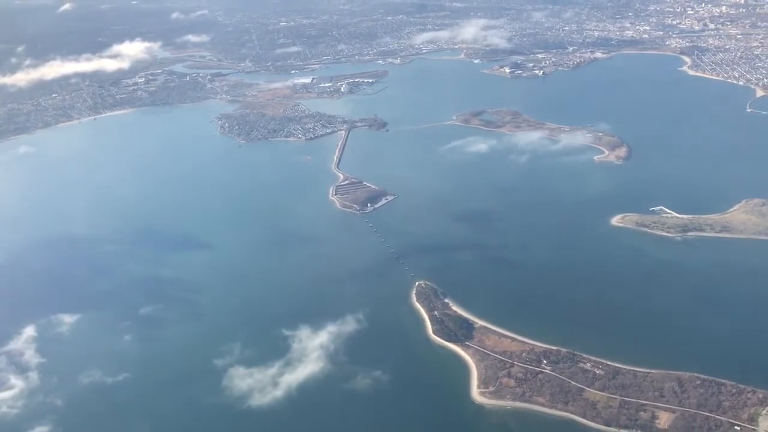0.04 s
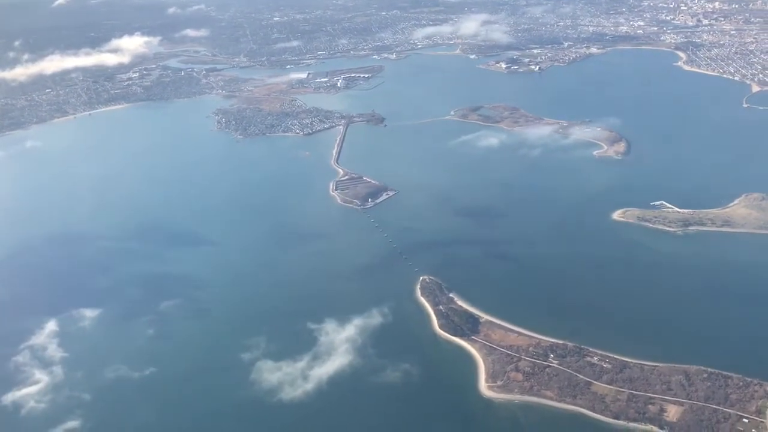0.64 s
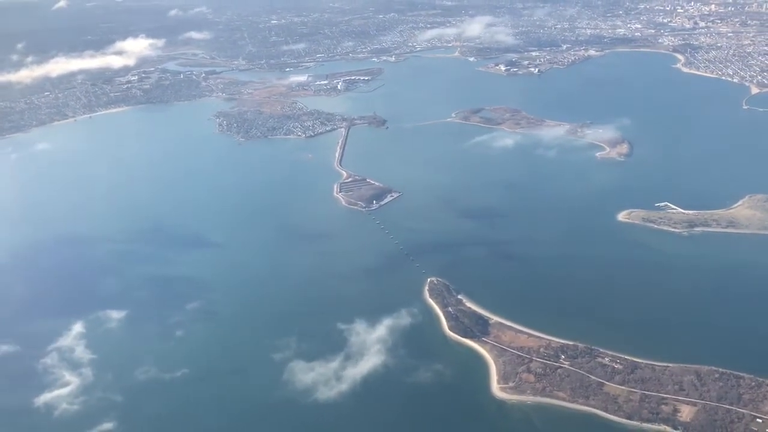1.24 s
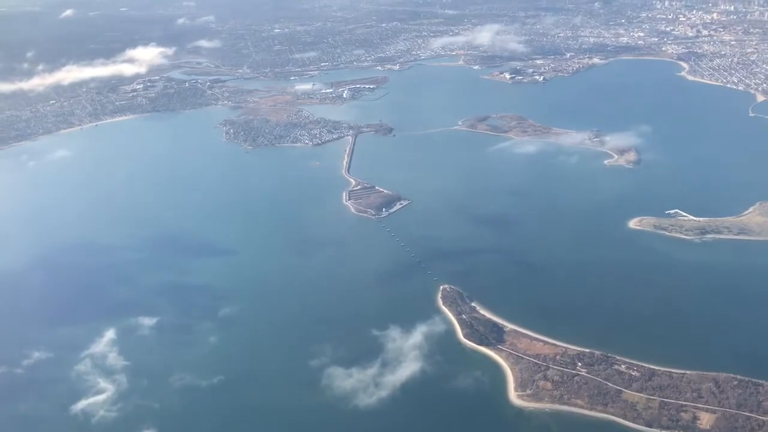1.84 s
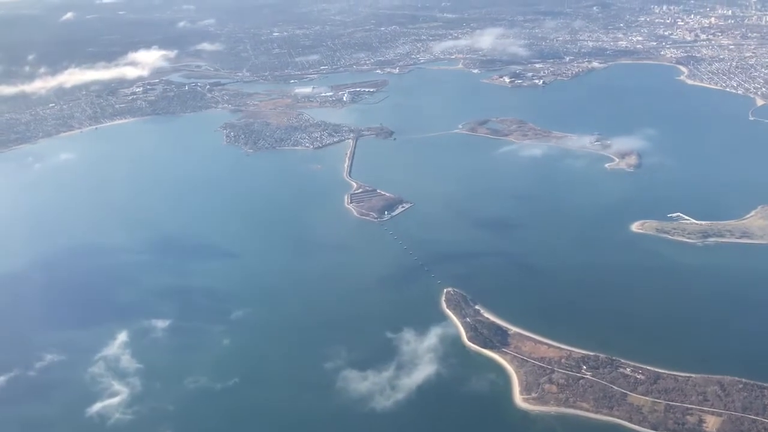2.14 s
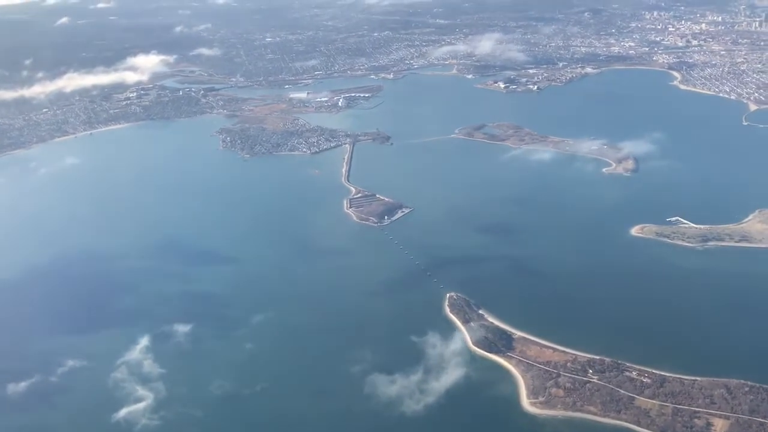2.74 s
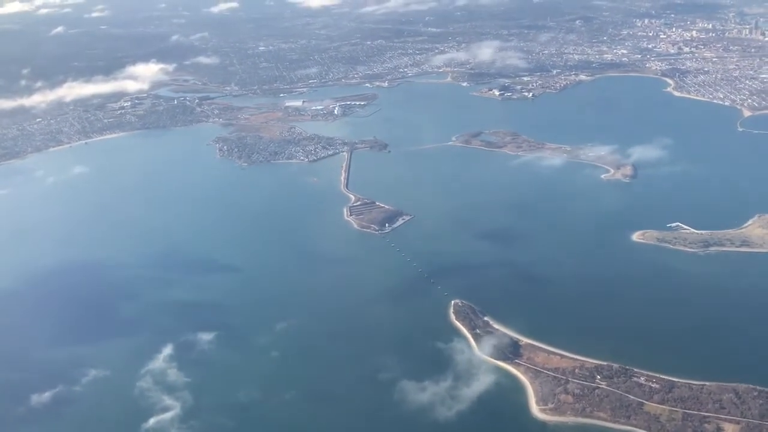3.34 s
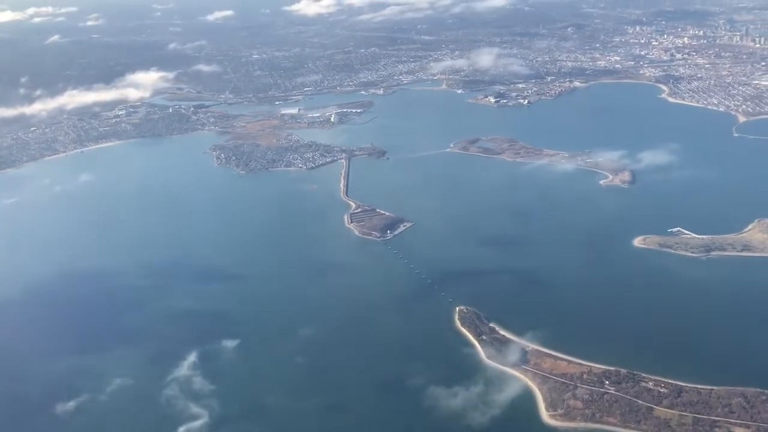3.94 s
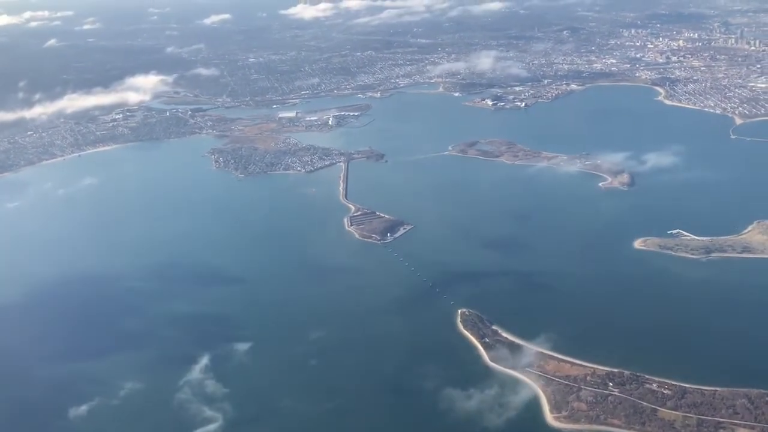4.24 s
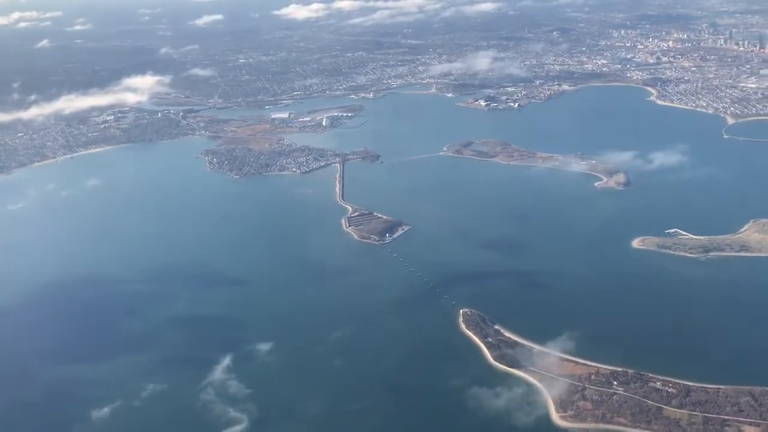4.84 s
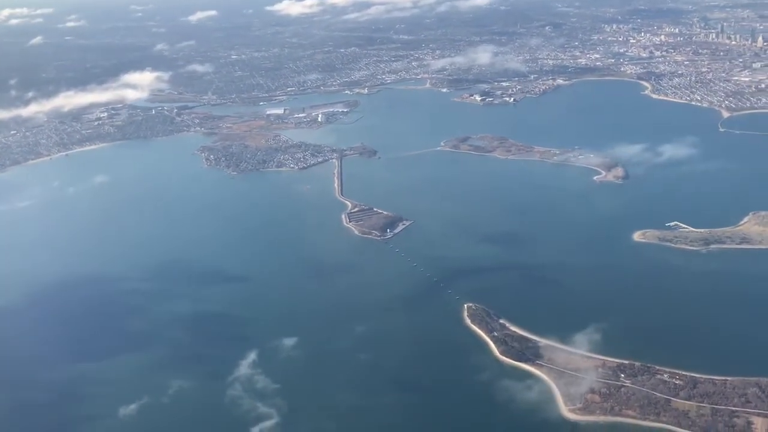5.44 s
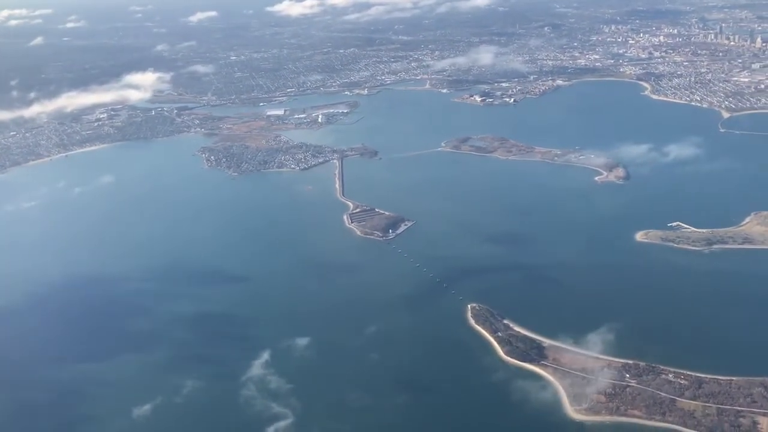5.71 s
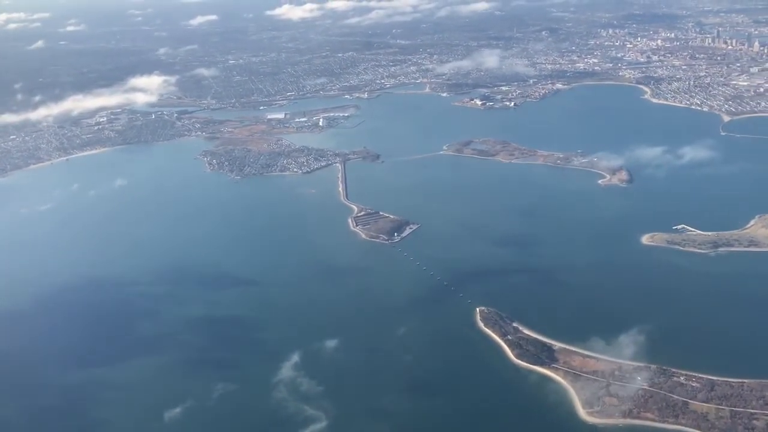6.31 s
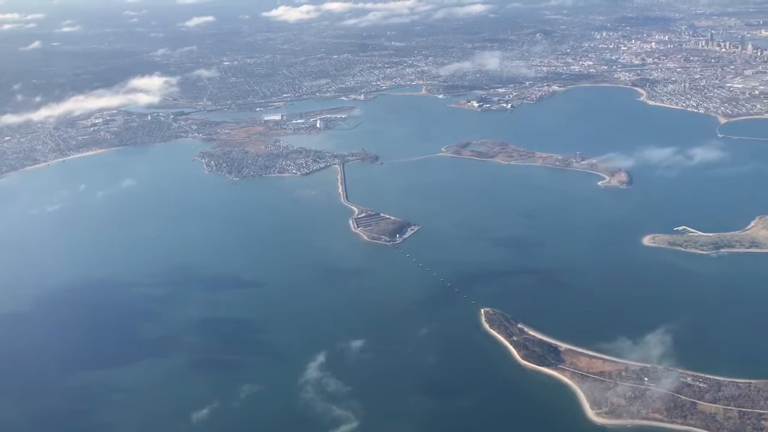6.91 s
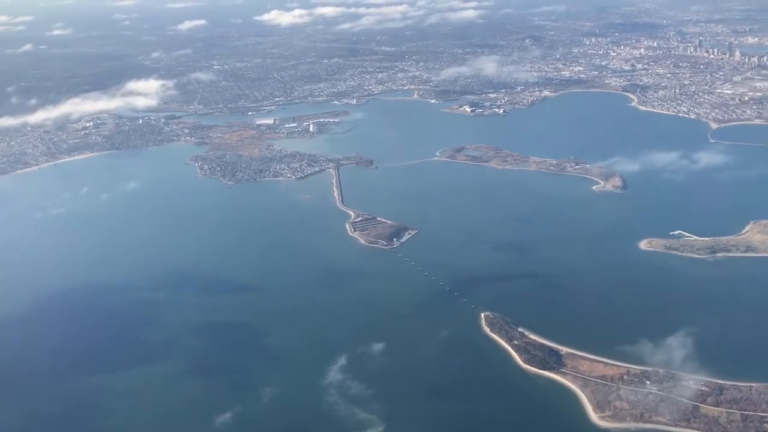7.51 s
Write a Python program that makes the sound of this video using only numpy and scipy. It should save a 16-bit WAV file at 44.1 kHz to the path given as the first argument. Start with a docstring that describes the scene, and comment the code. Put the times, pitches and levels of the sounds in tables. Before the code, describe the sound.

Inside an airliner cabin during descent, heard from a window seat, a deep engine drone and the low boom of air rushing over the fuselage run steadily throughout. Above them sit a soft vent hiss and a thin, steady high whine. A fainter, higher whistle eases back about three seconds in, and a few tiny plastic ticks are barely audible around then. The overall level stays even.

```python
"""A steady boom of air over a deep engine drone: an airliner cabin on descent, by a window.
Turbulence on the fuselage drives panel and cabin resonances; unbalanced fans hum, slowly winding down.
Engine cores, pumps and blowers hold their tones; the vents hiss.
A small turbine whistles thinly, climbs, then is eased back. Plastic trim slips with faint ticks."""
import sys
import numpy as np
from scipy import signal
from scipy.fft import rfft, irfft
from scipy.io import wavfile

SR = 44100
rng = np.random.default_rng(int(sys.argv[2]) if len(sys.argv) > 2 else 0)


def waveform_to_disk(signal):
    """Save audio, clipped to [-1, 1], as 16-bit WAV at the path in sys.argv[1]."""
    frames = np.transpose(np.atleast_2d(signal))
    scaled = np.clip(frames, -1, 1) * 32767
    samples = np.round(scaled).astype(np.int16)
    wavfile.write(sys.argv[1], SR, samples)


N = 333816
TIME_S = np.arange(N) / SR
BIN_HZ = np.fft.rfftfreq(N, 1 / SR)

# fuselage air noise through the wall: f/Hz, density/(dB per Hz)
FUSELAGE_SPECTRUM = [(15, -71), (38, -63), (50, -44), (60, -51), (73, -61), (145, -62.5), (240, -60),
                     (340, -59.5), (420, -68), (620, -71.5), (1000, -79.5), (1600, -87), (3000, -101.5),
                     (6000, -130)]
# panel and cabin resonances: f/Hz, width/Hz, lift/dB
CABIN_MODES = [(109, 64.6, 17.5), (175.5, 51, 7), (216, 6.5, 7), (312.6, 84.6, 9.5), (570, 124, 4),
               (801, 24, 6), (932, 158, 6.5), (1243, 154, 5), (1417, 70, 8.5)]
# engine core, blower and pump tones: f/Hz, level/dB, wander/Hz, fuzz share/1, fuzz width/Hz
ROTOR_TONES = [ (190.9, -37.5, 0.27, 0.34, 2.5), (388.7, -48, 0.31, 0.21, 2.4),
               (1165, -62.5, 1.49, 0.26, 10), (2165, -67.5, 3.96, 0.74, 20), (2295.5, -53.7, .45, .03, 4),
               (2875, -72, 1.5, .4, 12), (4095, -79.5, 3, .6, 18), (5152, -71.3, 5, .6, 22),
               (6116, -77.5, 2.5, .4, 14), (11800, -87, 20, 1, 130), ]
# vent hiss: f/Hz, density/(dB per Hz)
VENT_SPECTRUM = [(300, -125), (800, -101.6), (1800, -85), (3000, -86), (3300, -89), (4400, -91),
                 (4900, -94), (5400, -91.5), (7000, -96), (7700, -100.1), (8500, -96), (9500, -99.8),
                 (10400, -106.2), (11600, -101.9), (15500, -105.9)]
# air duct resonances: f/Hz, width/Hz, lift/dB
DUCT_MODES = [(2706, 280, 5.5), (2997, 45, 7.5)]
# plastic trim ticks: t/s, peak level/dB, f/Hz, width/Hz, rise/s
TRIM_TICKS = [ (2.917, -44.5, 13200, 4400, .0015), (3.834, -50, 9000, 9000, .001),
              (3.881, -38, 3450, 220, .0015), ]

FAN_START_HZ, FAN_SAG_HZ_PER_S = 46.15, .155
SHAFT_HZ = FAN_START_HZ - FAN_SAG_HZ_PER_S * TIME_S


def fuselage():
    """Air rushing over the skin booms through panels and cabin."""
    return airflow(FUSELAGE_SPECTRUM, CABIN_MODES, gust_db=.4, gust_hz=4.7)


def fan():
    """Unbalance shakes the airframe once a turn: a near-pure drone, fading as the shaft slows."""
    start_db, loss_db_per_hz = -25.7, 4.5
    level_db = start_db - loss_db_per_hz * (FAN_START_HZ - SHAFT_HZ)
    return gain_of(level_db) * tone(SHAFT_HZ, fuzz=.01, width_hz=2.5)


def rotors():
    """Cores, blowers and pumps hold speed, with slight wander."""
    return sum(gain_of(level_db) * tone(hz + wander_hz * drift(rate_hz=.806), fuzz, width_hz)
               for hz, level_db, wander_hz, fuzz, width_hz in ROTOR_TONES)


def vents():
    """Duct-coloured hiss; weak echoes off wall, seats and bins ripple its spectrum."""
    echo_db, spread_s, count = -18, .018, 24
    hiss = airflow(VENT_SPECTRUM, DUCT_MODES, gust_db=.1, gust_hz=4)
    delays = (rng.uniform(.1, 1, count) * spread_s * SR).astype(int)
    signs = rng.choice([-1, 1], count)
    echoes = sum(sign * np.roll(hiss, delay) for sign, delay in zip(signs, delays))
    return hiss + gain_of(echo_db) * echoes / np.sqrt(count)


def turbine_whistle():
    """Blade tone, scattered by turbulence; climbs until eased, then softens fast and coasts down."""
    start_hz, climb_hz_per_s, settled_hz = 8610, 26, 8560
    ease_at_s, coast_tau_s = 3.0, 1.2
    start_db, drop_db, fade_s = -64.5, 3.6, .25
    eased_s = np.maximum(TIME_S - ease_at_s, 0)
    level_db = start_db - drop_db * np.minimum(eased_s / fade_s, 1)
    driven_hz = start_hz + climb_hz_per_s * np.minimum(TIME_S, ease_at_s)
    blade_hz = settled_hz + (driven_hz - settled_hz) * np.exp(-eased_s / coast_tau_s)
    blade_hz += 7 * drift(rate_hz=5)
    core = tone(blade_hz, fuzz=.55, width_hz=24)
    # uneven blades: side tones at +/-2 shaft orders
    sides = sum(tone(blade_hz + order * SHAFT_HZ, fuzz=.85, width_hz=22) for order in (-2, 2))
    skirt = tone(blade_hz, fuzz=.8, width_hz=140)
    return gain_of(level_db) * (gain_of(-3.5) * core + gain_of(-7.5) * sides + gain_of(-4) * skirt)


def whine_harmonic():
    """Second harmonic of the 2295.5 Hz rotor whine: a thin tone that swells and ebbs."""
    whine_hz, mean_db, swell_db = 4591, -68.9, 1.3
    level_db = mean_db + swell_db * drift(rate_hz=.8)
    return gain_of(level_db) * tone(whine_hz + drift(rate_hz=.87), fuzz=.074, width_hz=9)


def trim_ticks():
    """Plastic panels slip in their seats: tiny bursts of band noise."""
    ticks = np.zeros(N)
    for start_s, peak_db, hz, width_hz, rise_s in TRIM_TICKS:
        ring = noise(1 / (1 + (2 * (BIN_HZ - hz) / width_hz) ** 4))
        age = np.maximum(TIME_S - start_s, 0) / rise_s
        burst = ring * age * np.exp(-age)
        ticks += gain_of(peak_db) * burst / abs(burst).max()
    return ticks


def airflow(spectrum, modes, gust_db, gust_hz):
    """Turbulence: broad slope, lifted at each resonance, swelling slightly."""
    knot_hz, knot_db = np.transpose(spectrum)
    slope_db = np.interp(np.log(BIN_HZ + 1), np.log(knot_hz + 1), knot_db)
    lift_db = sum(db / (1 + (2 * (BIN_HZ - hz) / width_hz) ** 2) for hz, width_hz, db in modes)
    return noise(gain_of(slope_db + lift_db)) * gain_of(gust_db * drift(gust_hz))


def tone(hz, fuzz, width_hz):
    """Unit-rms tone on a pitch curve; turbulence smears the power share `fuzz` into a narrow band."""
    phase = 2 * np.pi * (np.cumsum(hz) / SR + rng.random())
    smear = drift(width_hz) * np.cos(phase) + drift(width_hz) * np.sin(phase)
    return np.sqrt(2 * (1 - fuzz)) * np.cos(phase) + np.sqrt(fuzz) * smear


def drift(rate_hz):
    """Unit-rms random wander, rolled off above rate_hz."""
    wander = noise(1 / (1 + (BIN_HZ / rate_hz) ** 2))
    return wander / np.sqrt(np.mean(wander ** 2) + 1e-20)


def noise(gain_per_root_hz):
    """Gaussian noise of given spectral density."""
    return irfft(rfft(rng.standard_normal(N)) * gain_per_root_hz, N) * np.sqrt(SR / 2)


def gain_of(db):
    """dB to amplitude."""
    return 10 ** (np.asarray(db) / 20)


def scene():
    """Mono sum at the seat."""
    mix = fuselage() + vents() + fan() + rotors() + whine_harmonic() + turbine_whistle() + trim_ticks()
    return mix[None]


def record(dry):
    """Microphone bass roll-off, then a steep band limit."""
    bass_cut_hz, band_limit_hz = 26, 15720
    high_pass = signal.butter(2, bass_cut_hz, "highpass", fs=SR, output="sos")
    low_pass = signal.firwin(1023, band_limit_hz, window=("kaiser", 9), fs=SR)
    return signal.oaconvolve(signal.sosfilt(high_pass, dry), low_pass[None], "same")


dry = scene()
out = record(dry)
waveform_to_disk(out)
```